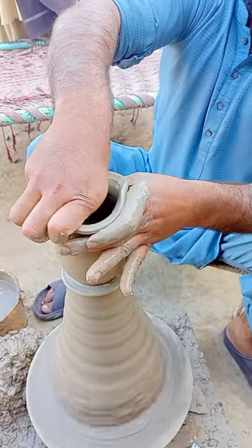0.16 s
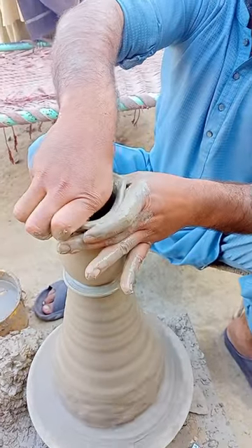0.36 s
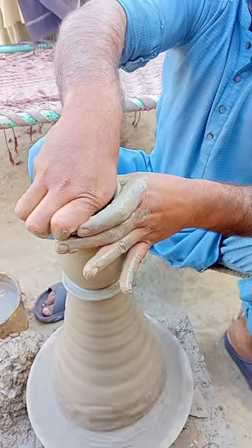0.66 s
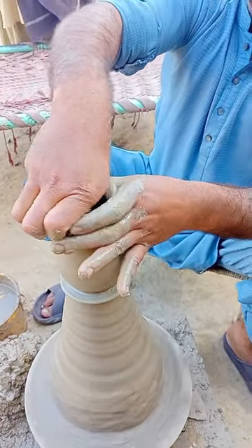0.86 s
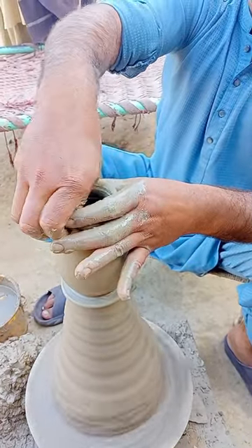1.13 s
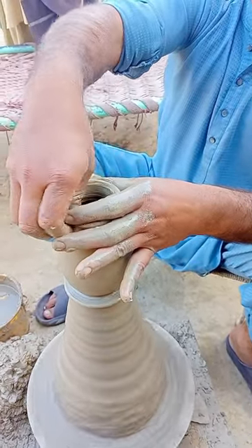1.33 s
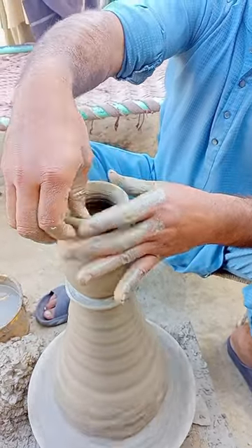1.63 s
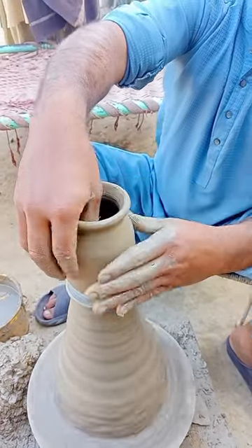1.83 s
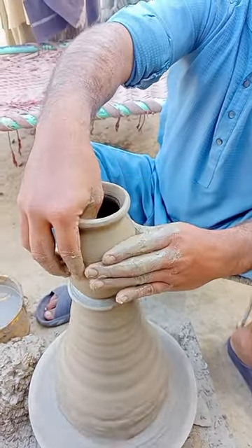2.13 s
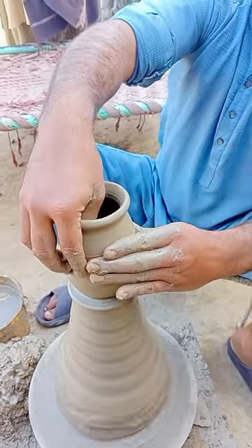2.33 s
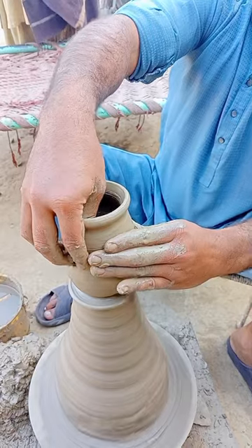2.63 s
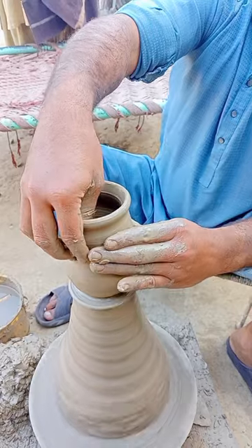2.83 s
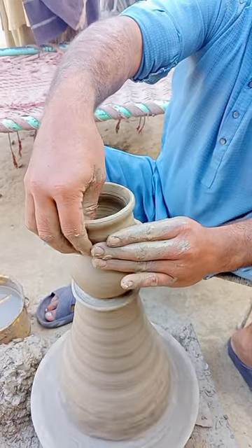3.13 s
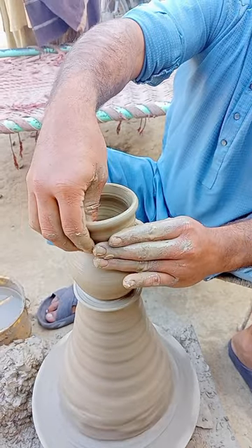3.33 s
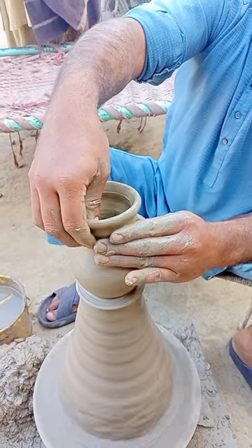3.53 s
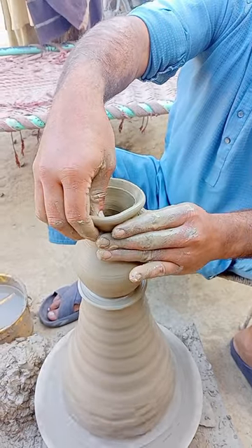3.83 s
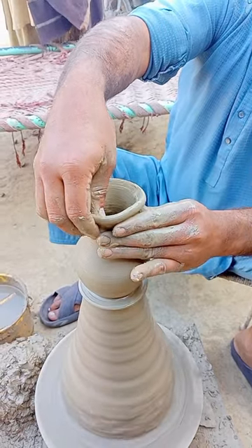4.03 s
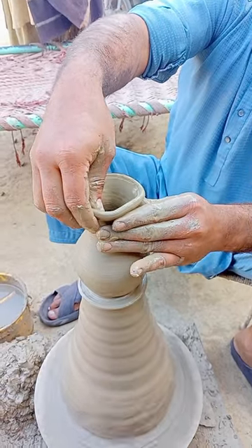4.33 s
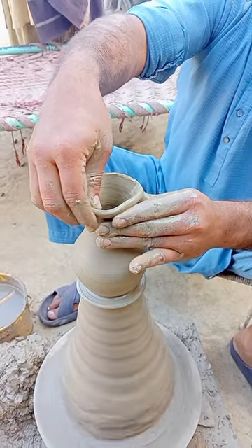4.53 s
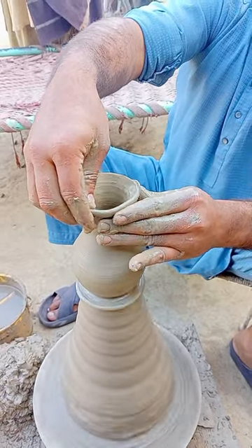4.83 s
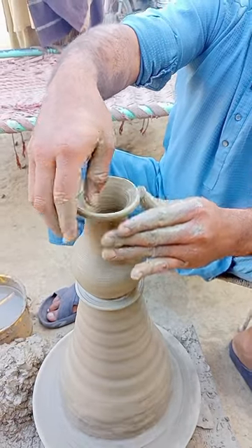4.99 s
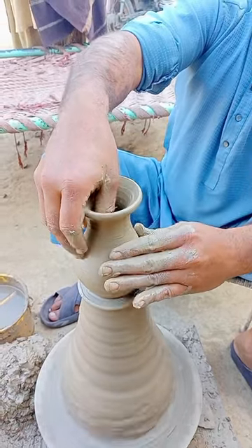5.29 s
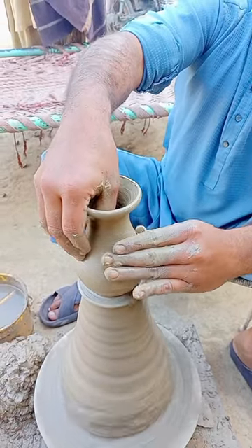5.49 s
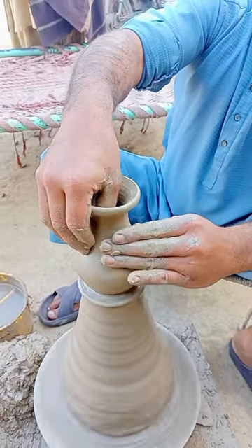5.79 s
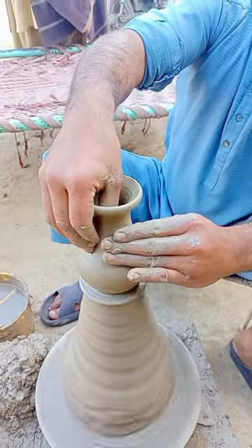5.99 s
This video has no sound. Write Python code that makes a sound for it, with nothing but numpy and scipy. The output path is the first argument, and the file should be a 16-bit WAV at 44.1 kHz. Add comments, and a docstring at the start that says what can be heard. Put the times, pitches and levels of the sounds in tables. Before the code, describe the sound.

An electric potter's wheel runs close to the microphone in an open, dry yard. Its mid-pitched motor whine holds nearly steady over grinding bearings, soft hiss and low rumble. Quick light rubs pulse about twelve times a second, with small bright ticks and a dull bump. From about two seconds, pressure on the clay brings spells of loud, rasping chatter with a squeal, easing near five seconds.

```python
"""An electric potter's wheel spins at a steady speed in an open yard.
From the start the motor whines, bearing knocks ring the frame, and a low rumble lies beneath faint wavering tones.
The drive rubs about twelve times a second; bright ticks and dull bumps, made of short noise, soon join in.
From about two to five seconds, hands press on the clay in spells: the drive slips each turn, and chatters
in short rasping bursts of resonant noise with a squeal."""
import sys
import numpy as np
from scipy import signal
from scipy.fft import rfft, irfft
from scipy.io import wavfile
from scipy.ndimage import uniform_filter1d

SR = 44100
rng = np.random.default_rng(int(sys.argv[2]) if len(sys.argv) > 2 else 0)


def store_pcm(level_fs):
    """Save levels as 16-bit WAV."""
    pcm = np.round(np.clip(level_fs, -1, 1) * 32767).astype(np.int16)
    wavfile.write(sys.argv[1], SR, np.atleast_2d(pcm).T)


N = 271215

DRIVE_HZ = 12.27  # turns a second
TIGHT_SPOT_S = 0.034  # when the drive first passes its tight spot


def from_db(db):
    """Decibels to gain."""
    return 10 ** (np.asarray(db) / 20)


def rms_one(x):
    """Scale to rms 1."""
    return x / np.sqrt(np.mean(x ** 2) + 1e-20)


def clock():
    """Time of every sample, in seconds."""
    return np.arange(N) / SR


def in_time(rows):
    """The columns of a curve table, drawn as straight lines between its times."""
    times_s, *columns = np.transpose(rows)
    return [np.interp(clock(), times_s, column) for column in columns]


def drift(rate_hz):
    """Slow random wandering with a spread of about 1: noise through two equal low-pass poles."""
    step = 40  # samples between the computed points
    pole = np.exp(-2 * np.pi * rate_hz * step / SR)
    warm_up = 2000
    noise = rng.standard_normal(N // step + 2 + warm_up)
    slow = signal.lfilter([1], [1, -2 * pole, pole * pole], noise)[warm_up:]
    return np.interp(np.arange(N) / step, np.arange(len(slow)), rms_one(slow))


def sine(hz):
    """A tone of rms 1 that follows a pitch curve."""
    return np.sqrt(2) * np.sin(2 * np.pi * np.cumsum(hz) / SR)


def coloured_noise(colour):
    """Noise of rms 1 shaped by a spectrum curve, falling away steeply below its first frequency."""
    hz, db = np.transpose(colour)
    bins_hz = np.maximum(np.arange(N // 2 + 1) * SR / (2 * (N // 2)), 1)
    gain = from_db(np.interp(np.log(bins_hz), np.log(hz), db))
    gain = gain * np.minimum(bins_hz / hz[0], 1) ** 2
    return rms_one(irfft(rfft(rng.standard_normal(N)) * gain, N))


def resonate(forces, modes):
    """Parallel resonances, each of two equal stages; neighbours in the list are driven from different contacts."""
    out = np.zeros(N)
    for k, (hz, width_hz, db) in enumerate(modes):
        r = np.exp(-np.pi * width_hz / SR)
        peak_gain = (1 - r * r) / 2
        stage = [peak_gain, 0, -peak_gain, 1, -2 * r * np.cos(2 * np.pi * hz / SR), r * r]
        ringing = signal.sosfilt([stage, stage], forces[k % 2] + 1e-18)
        # a narrow mode catches less of a white force, so it is raised
        out += from_db(db) * np.sqrt(2 * SR / (np.pi * width_hz)) * ringing
    return out


def impacts(per_s, spread_db):
    """Tiny random knocks of uneven strength and either sign at two contacts, rms 1."""
    born = rng.random((2, N)) < per_s / SR
    strength = from_db(spread_db * rng.standard_normal((2, N)))
    return rms_one(born * rng.choice([-1, 1], (2, N)) * strength)


def settle(ringing, window_s):
    """A driven vibration gains energy as fast as it loses it, so its level settles near rms 1."""
    power = np.abs(uniform_filter1d(ringing ** 2, max(int(window_s * SR), 1)))
    return ringing / np.sqrt(power + 1e-12)


def sustained(modes, per_s, settle_s):
    """Modes kept ringing at an even level by friction, made of dense tiny knocks."""
    return settle(resonate(impacts(per_s, spread_db=1.0), modes), settle_s)


def gate(start_s, length_s, attack_s, release_s):
    """Opens and closes with straight slopes, half open at the start and at the end."""
    t = clock()
    opening = (t - start_s) / attack_s
    closing = (start_s + length_s - t) / release_s
    return np.clip(np.minimum(opening, closing) + .5, 0, 1)


def each_turn(lag_s, length_s, attack_s, release_s, uneven_db, jitter_s):
    """One push near the tight spot of every turn of the drive, each a little different in time and strength."""
    spots_s = np.arange(TIGHT_SPOT_S, N / SR, 1 / DRIVE_HZ)
    chance = rng.standard_normal((len(spots_s), 2))
    pushes = np.zeros(N)
    for spot_s, (strong, late) in zip(spots_s, chance):
        start_s = spot_s + lag_s + jitter_s * late - length_s / 2
        pushes += from_db(uneven_db * strong) * gate(start_s, length_s, attack_s, release_s)
    return pushes


def whine(swing):
    """The motor's tone, roughened by its housing, throbs with the drive; a thin tone flutters above, a hum below."""
    # path of the motor tone: time_s, pitch_hz, relative_level_db
    motor_curve = [(0, 635, -30.5), (.7, 638.4, -31), (1.8, 640, -31.5), (2.9, 638.5, -32),
                   (3.25, 642, -27.5), (3.5, 637, -33), (3.85, 642.4, -30.5), (5.0, 636.2, -32),
                   (6.15, 641.4, -30.5)]
    # resonance of the motor housing: pitch_hz, stage_width_hz, level_against_tone_db
    housing_modes = [(645, 64, -4.5)]
    hz, level_db = in_time(motor_curve)
    hz = hz + 2.216 * drift(12.6)
    rough = sine(hz) + resonate(impacts(per_s=5000, spread_db=1.5), housing_modes)
    tone = from_db(level_db + 1.48 + 0.2 * swing) * settle(rough, .06)

    upper_db = level_db - 16.5 + 1.4 * swing + 1.4 * drift(23)
    upper = from_db(upper_db) * sine(hz * 5 / 2 + 11 * drift(29.0))
    hum = from_db(-50 + 3.4 * drift(4.1)) * sine(90.6 + 4 * drift(7.3))
    return tone + upper + hum


def bearings(swing, throb_db=0.03, uneven_db=1.8, hiss_db=-43.5, hiss_share=1.0):
    """Dense rolling knocks ring the frame and hiss, very slightly harder once in each turn of the drive."""
    # frame resonances: pitch_hz, stage_width_hz, level_db
    frame_modes = [(419, 34, -55), (584, 130, -47.5), (692.5, 52, -39), (782.5, 45, -48), (996, 100, -51),
                   (1176, 150, -49.5), (1520, 86, -44), (1595.3, 74, -45), (1691, 87, -51.5),
                   (1818, 68, -50.5), (1917, 80, -48.5), (2117, 21, -61), (2228, 81, -56), (2600, 45, -73),
                   (2950, 260, -58), (3117, 77, -56), (3254, 40, -64), (3455, 160, -63), (3880, 99, -64),
                   (4140, 100, -68.5), (5635, 310, -66.5), (6950, 900, -66.5), (8140, 120, -74.5),
                   (8410, 190, -71)]
    # spectrum of the running wheel's broad hiss: frequency_hz, relative_density_db (per Hz)
    hiss_colour = [(300, -13), (600, 4), (850, -4), (1050, -1.5), (1360, -7.5), (2000, -8), (2420, -18),
                   (3600, -16), (4900, -22.5), (6300, -30.5), (8800, -25.5), (10500, -40.5), (12500, -41),
                   (14000, -35.5), (16000, -40)]
    load_db = throb_db * swing + uneven_db * drift(25.0)
    grind = resonate(impacts(per_s=5000, spread_db=3.0) * from_db(load_db), frame_modes)
    hiss = from_db(hiss_db + hiss_share * load_db) * coloured_noise(hiss_colour)
    return grind + hiss


def yard(rumble_trim_db=0.5, deep_trim_db=4.0, tones_trim_db=-1.5, waver=0.012, flicker_db=4.5):
    """Low rumble from two bands of noise, and faint tones that waver in pitch and flicker in level."""
    # level of the rumble: time_s, relative_deep_level_db, relative_body_level_db
    rumble_curve = [(0, -62, -44), (1.0, -61.5, -44), (1.45, -54, -42.5), (2.1, -62, -43.5),
                    (3.1, -66, -43), (3.6, -65, -42.5), (3.95, -63, -41.5), (4.6, -59.5, -45),
                    (6.15, -65, -44)]
    # spectrum of the rumble's body: frequency_hz, relative_density_db (per Hz)
    body_colour = [(60, -15), (100, 3.5), (135, 7), (185, -2), (235, 6.5), (290, 5.5), (350, -1.5),
                   (430, -1.5), (560, -1), (900, -39)]
    # spectrum of its deep part: frequency_hz, relative_density_db (per Hz)
    deep_colour = [(20, -15.5), (40, 0), (58, 5), (72, 0), (105, 5.5), (160, -13.5), (400, -42.5)]
    # faint tones that come and go: start_s, length_s, start_pitch_hz, end_pitch_hz, relative_level_db
    faint_tones = [(0.0, 1.1, 782, 781, -43.5), (0.0, 1.18, 1168, 1174, -45.5),
                   (0.234, 0.13, 925, 920, -42), (4.19, 0.11, 1030, 1030, -48),
                   (4.797, 0.23, 1020, 1000, -47.5), (4.9, 1.3, 160.6, 162.3, -51.5),
                   (5.297, 0.212, 847, 870, -45), (5.506, 0.25, 885, 975, -46.5),
                   (5.801, 0.2, 910, 900, -47.5)]
    deep_db, body_db = in_time(rumble_curve)
    out = from_db(body_db + rumble_trim_db + 2.46 * drift(10.6)) * coloured_noise(body_colour)
    out += from_db(deep_db + deep_trim_db) * coloured_noise(deep_colour)
    for start_s, length_s, start_hz, end_hz, db in faint_tones:
        glide_hz = np.interp(clock(), [start_s, start_s + length_s], [start_hz, end_hz])
        hz = glide_hz * (1 + waver * drift(36.0))
        level = from_db(db + tones_trim_db + flicker_db * drift(21))
        out += level * gate(start_s, length_s, 0.067, 0.029) * sine(hz)
    return out


def rubs(length_s=0.027, lead_s=0.015, edge_s=0.024, hard_trim_db=-4.5):
    """The drive brushes lightly before its tight spot, now and then harder, and sets its resonances singing."""
    # strength of the light brushing: time_s, level_db
    brush_curve = [(0, -39), (1.1, -37), (1.8, -43), (2.7, -49), (3.1, -34.5), (4.7, -34.5), (6.15, -39.5)]
    # hardest rubs: time_s, relative_level_db
    hard_rubs = [(.091, -25), (0.576, -22.5), (.739, -26), (0.865, -33), (.989, -28.5), (1.28, -25.5),
                 (1.521, -25.5), (3.599, -25.5), (4.833, -25)]
    # what the rubs ring with: pitch_hz, stage_width_hz, relative_level_db
    rub_modes = [(1525, 110, -15), (1595, 31, -8), (3100, 370, -36)]
    light_db, = in_time(brush_curve)
    light = from_db(light_db) * each_turn(lag_s=-0.017, length_s=0.027, attack_s=0.038, release_s=0.031,
                                          uneven_db=4.0, jitter_s=0.0086)
    hard = sum(from_db(db + hard_trim_db) * gate(time_s - lead_s, length_s, edge_s, edge_s)
               for time_s, db in hard_rubs)
    return np.maximum(light, hard) * sustained(rub_modes, per_s=4800, settle_s=0.051)


def ticks(tick_trim_db=-2, speck_db=-69, decay_s=.004):
    """Short bright snaps, as of wet clay under the fingers, decay at once; finer specks ring at random."""
    # small wet ticks: time_s, relative_level_db
    tick_hits = [(0.161, -44), (0.502, -39), (0.6897, -37), (0.975, -38), (3.0076, -40), (3.279, -41),
                 (4.0033, -38), (4.322, -40), (4.508, -35), (4.6607, -38.5), (5.443, -36)]
    # spectrum of the ticks: frequency_hz, relative_density_db (per Hz)
    tick_colour = [(800, -2), (2500, 8.5), (4200, 15.5), (6000, 1), (8400, 6), (10500, -9), (14000, -8),
                   (16000, -8)]
    # what the specks ring with: pitch_hz, stage_width_hz, relative_level_db
    speck_modes = [(8200, 690, -5), (13000, 2000, -11)]
    hits = np.zeros(N)
    for time_s, db in tick_hits:
        hits[round(time_s * SR)] = from_db(db + tick_trim_db)
    envelope = signal.lfilter([1], [1, -np.exp(-1 / (decay_s * SR))], hits)
    snaps = envelope * coloured_noise(tick_colour)
    specks = resonate(impacts(per_s=7.8, spread_db=1.5), speck_modes)
    return snaps + from_db(speck_db) * specks


def bumps():
    """Short dull bumps in the low middle, each a single mode kept ringing while its gate is open."""
    # start_s, length_s, pitch_hz, stage_width_hz, level_db
    dull_bumps = [(0.558, 0.037, 510, 60.3, -33), (3.283, 0.056, 460, 220, -39)]
    out = np.zeros(N)
    for start_s, length_s, hz, width_hz, db in dull_bumps:
        ringing = sustained([(hz, width_hz, 0)], per_s=2600, settle_s=0.035)
        out += from_db(db) * gate(start_s, length_s, 0.012, 0.016) * ringing
    return out


def pressure(edge_s=0.01):
    """Strength of boom and rasp: each changes evenly in decibels through a spell of pressure on the clay."""
    # start_s, end_s, then relative levels: first_boom_db, last_boom_db, first_rasp_db, last_rasp_db
    spells = [(1.943, 2.273, -23.5, -19, -27, -30), (2.301, 2.68, -25, -20, -32.5, -34),
              (2.84, 3.42, -26, -24.5, -42, -37.5), (3.665, 3.99, -21, -31.5, -41, -33.5),
              (4.08, 4.14, -19.5, -20, -37, -39), (4.389, 4.89, -23.5, -18.5, -32.5, -43.5)]
    boom, rasp = np.zeros((2, N))
    for start_s, end_s, first_boom, last_boom, first_rasp, last_rasp in spells:
        held = gate(start_s, end_s - start_s, edge_s, edge_s)
        boom += held * from_db(np.interp(clock(), [start_s, end_s], [first_boom, last_boom]))
        rasp += held * from_db(np.interp(clock(), [start_s, end_s], [first_rasp, last_rasp]))
    return boom, rasp


def chatter(boom, rasp, body_db=-5.0, squeal_db=-3.0, squeal_hz=692.5, squeal_waver_hz=5.87):
    """Under load the drive slips for about half of each turn: it rasps, and the frame booms and squeals."""
    # low ringing of the chatter: pitch_hz, stage_width_hz, relative_level_db
    boom_modes = [(235, 200, -19), (448, 166, -13), (644.5, 64, 2), (700, 61, -2), (795, 42, -9.5)]
    # high ringing of the chatter: pitch_hz, stage_width_hz, relative_level_db
    rasp_modes = [(1240, 420, -8), (1804, 130, -1), (1880, 115, 3), (1980, 140, -6.5), (2130, 14, -18.5),
                  (2210, 15, -11.5), (3060, 310, -8), (3470, 560, -15.5), (5250, 2200, -25),
                  (7100, 240, -26.5)]
    booming = boom * each_turn(lag_s=-0.0013, length_s=0.034, attack_s=0.0082, release_s=0.02,
                               uneven_db=0.66, jitter_s=0.0014)
    rasping = rasp * each_turn(lag_s=-0.00084, length_s=0.043, attack_s=0.0088, release_s=0.028,
                               uneven_db=1.3, jitter_s=0.0018)
    squeal = from_db(squeal_db + 1.8 * drift(52)) * sine(squeal_hz + squeal_waver_hz * drift(31.2))
    body = from_db(body_db) * sustained(boom_modes, per_s=1200, settle_s=0.023)
    scrape = sustained(rasp_modes, per_s=760, settle_s=0.029)
    return booming * (squeal + body) + rasping * scrape


def scene(swing_lead_s=0.0076):
    """The wheel close by, in open air; whine and bearings throb with the turning drive."""
    # peaks once a turn, just before the tight spot
    swing = np.sqrt(2) * np.cos(2 * np.pi * DRIVE_HZ * (clock() - TIGHT_SPOT_S + swing_lead_s))
    boom, rasp = pressure()
    machine = whine(swing) + bearings(swing) + rubs() + chatter(boom, rasp)
    return (machine + yard() + ticks() + bumps())[None]


def record(dry):
    """The top is cut steeply above 15.8 kHz by an elliptic low-pass."""
    low_pass = signal.ellip(12, .1, 90, 15800, fs=SR, output="sos")
    return signal.sosfilt(low_pass, dry)


dry = scene()
out = record(dry)
store_pcm(out)
```